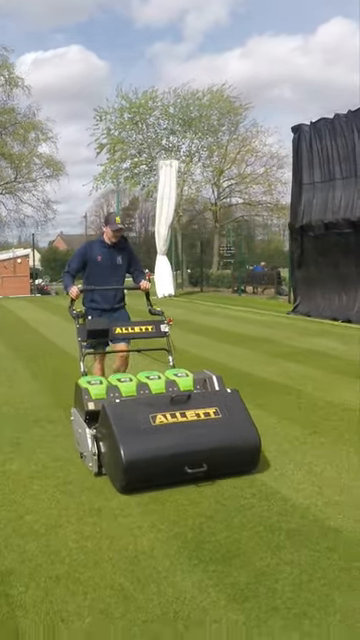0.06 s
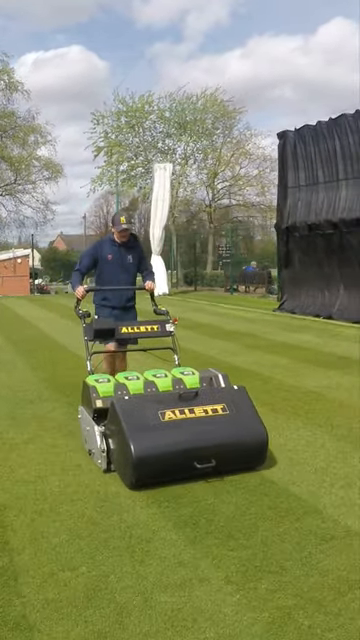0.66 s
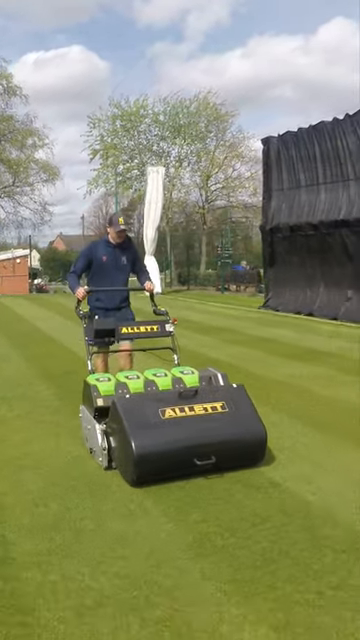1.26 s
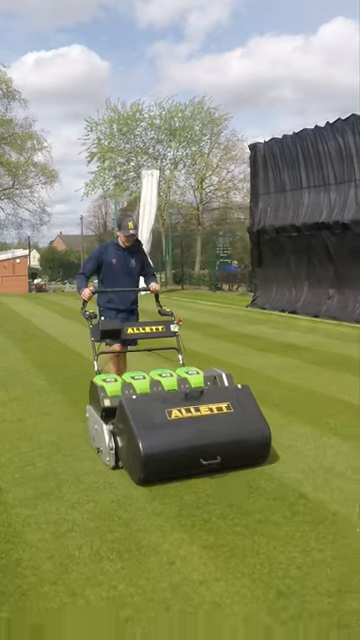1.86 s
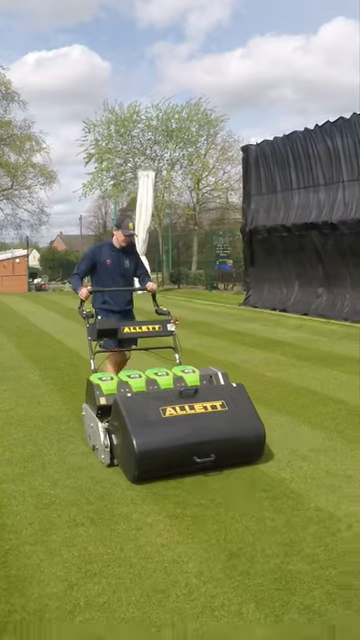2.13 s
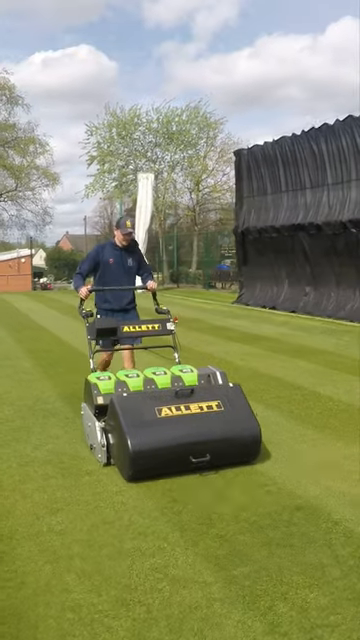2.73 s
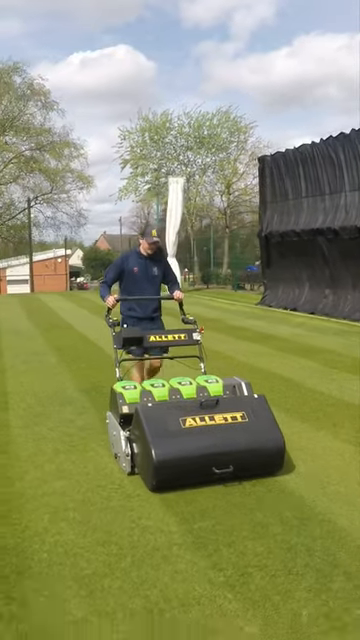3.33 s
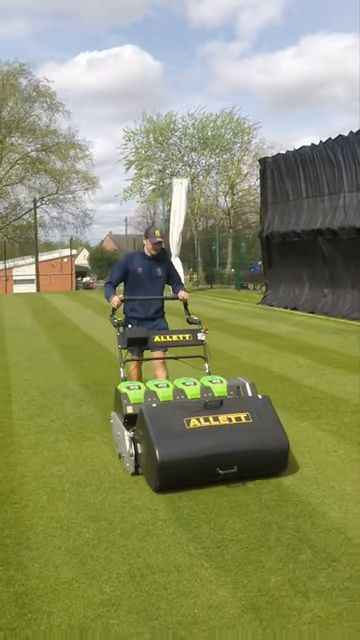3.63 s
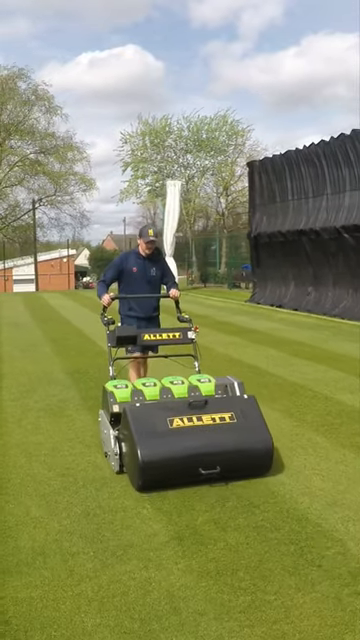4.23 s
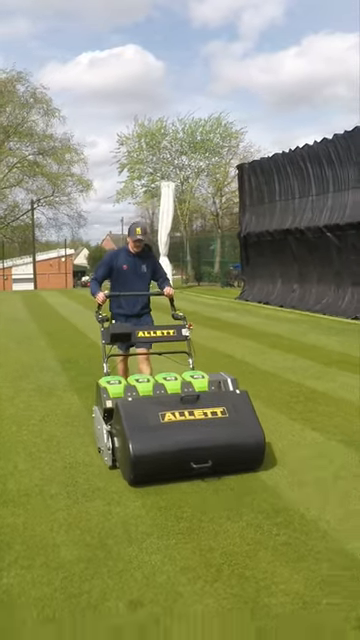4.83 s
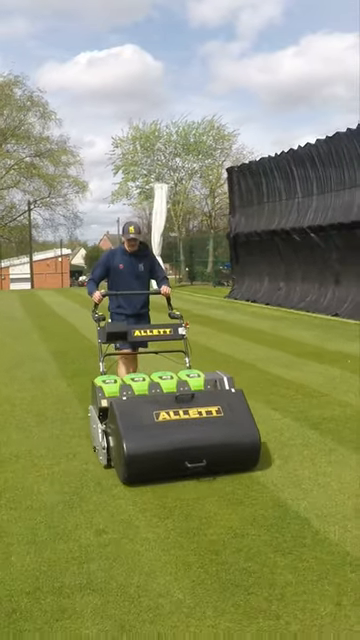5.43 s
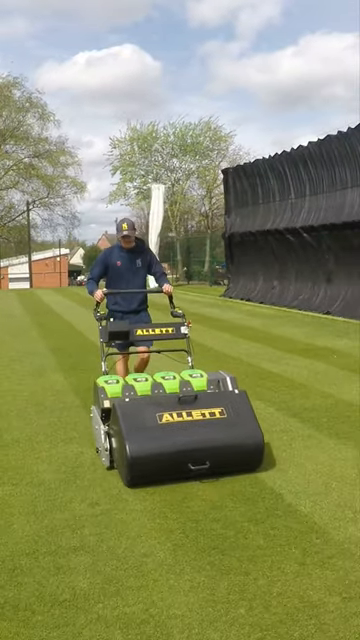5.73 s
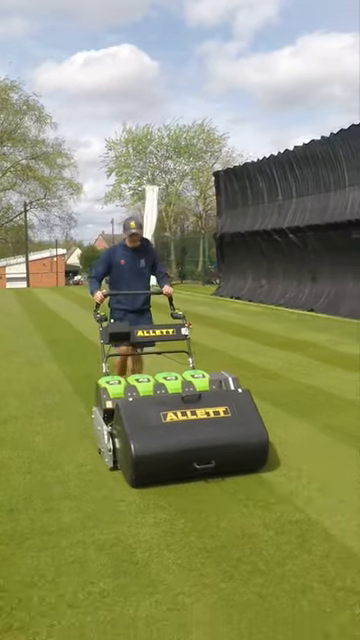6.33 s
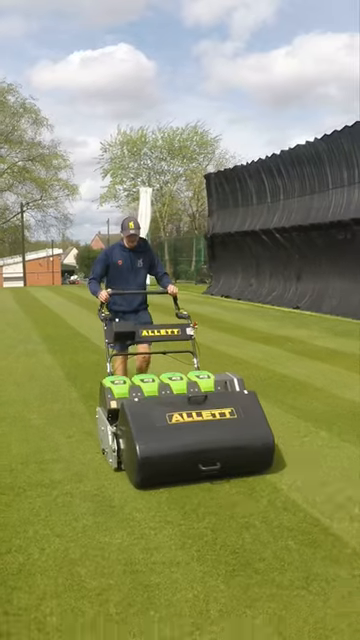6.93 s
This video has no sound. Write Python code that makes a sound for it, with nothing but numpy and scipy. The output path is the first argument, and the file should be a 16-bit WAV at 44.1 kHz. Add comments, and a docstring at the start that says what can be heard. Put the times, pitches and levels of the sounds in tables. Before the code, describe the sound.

Wind buffets the microphone over the steady hum, wavering whine and blade whirr of an electric cylinder mower cutting grass.

```python
"""A battery cylinder mower is walked over a lawn, a few metres from a hand-held phone that moves with it.
The blades brush the bottom blade and ring the deck, the roller booms in the grass box, cut grass hisses.
The motor hums, a gear whines and sags under load; grit ticks and a twig snaps in the blades.
Wind buffets the microphone; there are no walls to echo."""
import sys
import numpy as np
from scipy import signal
from scipy.fft import rfft, irfft
from scipy.io import wavfile
from scipy.ndimage import uniform_filter1d

SR = 44100
rng = np.random.default_rng(int(sys.argv[2]) if len(sys.argv) > 2 else 0)


def dump(signal):
    """Clip the signal to [-1, 1] and save it as 16-bit WAV at the path in sys.argv[1]."""
    limited = np.clip(np.atleast_2d(signal).T, -1, 1)
    pcm = np.round(limited * 32767).astype(np.int16)
    wavfile.write(sys.argv[1], SR, pcm)


N = 312228
TIME = np.arange(N) / SR
FREQ = np.maximum(np.arange(N // 2 + 1) * SR / N, 1)


def cutter():
    """The roller knocks the box; the blades rattle the deck and shear thousands of stalks a second."""
    # resonances: f/Hz, width/Hz, level/dB
    box_modes = [(61, 140, -57.5), (119.2, 23.5, -43), (138.7, 29, -47.5), (197, 61, -59), (270, 75, -70),
                 (350.5, 26.3, -61), (402.4, 41, -66), (460.4, 42, -70), (497.4, 30.3, -69.5)]  # grass box and chassis
    deck_modes = [(625, 21, -81), (726, 120, -77.5), (860, 83, -77), (936, 117, -77.5), (1053, 44, -87.5),
                  (1245, 185, -84), (1416, 140, -73), (1495, 134, -73), (1622, 184, -75.5),
                  (1865, 186, -78), (1986, 57, -76), (2117, 128, -80), (2333, 220, -85.5), (2560, 260, -89)]  # cutter and deck
    blade_modes = [(5980, 920, -79.5), (6750, 950, -95)]  # shearing blades
    # cut grass spraying into the box: f/Hz, level/dB
    spray_spectrum = [(500, -99), (2950, -93), (3350, -85), (4000, -85.5), (4850, -85.5), (5350, -93.5),
                      (7000, -87), (7900, -92.5), (8700, -90.5), (10000, -95), (11000, -100.5),
                      (12500, -102), (13500, -106), (15300, -110)]
    load_db = cutting_load_db()
    boom = colour(impacts(2500, 2.36), resonances(box_modes) * band(8.9, 517)) * undb(0.2 * load_db)
    whirr = colour(impacts(6000, 2.64), resonances(deck_modes)) * undb(0.24 * load_db)
    tufts = walk(26)  # sward thickness varies from cut to cut
    ring_db = 0.28 + 1.15 * load_db + 0.57 * tufts
    ring = colour(impacts(6000, 5.5), resonances(blade_modes)) * undb(ring_db)
    spray_db = 0.5 * load_db + 0.52 * tufts
    spray = colour(impacts(11000, 3.5), slope(spray_spectrum)) * undb(spray_db)
    return boom + whirr + ring + spray


def cutting_load_db():
    """Load follows the sward's thickness and surges as each step pushes the mower on."""
    # sward thickness: t/s, load/dB
    sward = [(0.0, 0.0), (0.6, 0.7), (1.2, 0.1), (1.5, 1.5), (1.8, 1.5), (2.4, -0.9), (3.1, -0.7),
             (3.65, 0.4), (4.5, -1.3), (5.3, -2), (5.75, 0.6), (6.25, -1.5), (6.55, -1.5), (7.08, -0.2)]
    step_hz, surge_db = 2.17, 0.73
    sward_db, = curves(sward)
    return sward_db + surge_db * np.cos(2 * np.pi * step_hz * TIME)


def motor():
    """The cutter motor hums at its turning rate; in spells the overtones swell to a buzz."""
    # hum: t/s, f/Hz, level/dB
    hum = [(0, 93.0, -51), (1.9, 93.7, -38), (3.05, 93.7, -39), (3.5, 92.9, -34.5), (4.1, 92.5, -40),
           (4.4, 92.3, -29), (5.0, 93.0, -30.5), (5.75, 92.3, -27), (6.3, 92.5, -30.5), (7.08, 92.2, -40)]
    # buzzy spells: start/s, length/s, level at centre/dB, centre/Hz
    buzzes = [(1.75, 1.17, -31.5, 108), (3.224, 0.32, -40, 287), (4.853, 0.88, -37, 187)]
    spread_hz, rest_db, sway_db = 110, -54.5, 1.5
    turn_hz, hum_db = curves(hum)
    out = tone(turn_hz, hum_db) * flutter(28, 0.33)
    for harmonic in (2, 3, 4):
        hz = harmonic * turn_hz
        buzz = 0
        for start_s, length_s, db, centre_hz in buzzes:
            nearness = np.exp(-((hz - centre_hz) / spread_hz) ** 2)
            buzz += undb(db) * nearness * spell(start_s, length_s, attack_s=0.1, release_s=0.28)
        out += np.hypot(buzz, undb(rest_db)) * tone(hz, sway_db * walk(3.3)) * flutter(27, 0.24)
    return out


def drive():
    """The drive gives a wavering drone and four steadier tones."""
    # drone: t/s, level/dB
    drone_levels = [(0, -48.5), (.9, -44), (1.5, -52), (2.9, -49), (4.2, -57), (5.1, -61), (6.05, -46.5),
                    (6.5, -56), (7.08, -51)]
    # drive tones: f/Hz, level/dB, wander/Hz, sway/dB
    partials = [(178, -44.5, 1.5, 2), (1428, -60, 6, 2.5), (1606, -64, 4, 2.5), (1948, -66, 9, 2)]
    drone_hz, drone_wander_hz = 355.2, 8.94
    drone_db, = curves(drone_levels)
    drone = tone(drone_hz + drone_wander_hz * walk(8.97), drone_db) * flutter(19, 0.34)
    return drone + sum(tone(hz + wander_hz * walk(8.4), db + sway_db * walk(2.4))
                       for hz, db, wander_hz, sway_db in partials)


def controller():
    """The speed controller sings at a constant pitch and its octave."""
    switch_hz = 1000
    return tone(switch_hz, -70 + 3.1 * walk(2.4)) + tone(2 * switch_hz, -66 + 3 * walk(2.2))


def gear():
    """The drive gear's whine sags in pitch with the load at every step and recovers."""
    # whine: t/s, level/dB
    whine_levels = [(0, -55), (.45, -54.5), (1.6, -54.5), (2.15, -55), (3.0, -57), (3.65, -53.5),
                    (4.3, -63), (5.6, -65), (6.5, -54), (7.08, -55.5)]
    mesh_hz, sag_hz_per_db, wander_hz = 800.4, 5, 9
    whine_db, = curves(whine_levels)
    whine_hz = mesh_hz - sag_hz_per_db * cutting_load_db() + wander_hz * walk(26)
    return tone(whine_hz, whine_db + 2.5 * walk(7.4)) * flutter(47, 0.37)


def bearing():
    """A bearing whistles faintly, climbs in pitch and fades."""
    # whistle: t/s, f/Hz, level/dB
    whistle = [(0, 1423, -57), (.5, 1510, -55), (.8, 1524, -58.5), (1.3, 1556, -55), (1.8, 1559, -51.5),
               (2.6, 1558, -58), (3.1, 1524, -74), (7.08, 1560, -68)]
    hz, db = curves(whistle)
    return tone(hz + 9 * walk(17.1), db) * flutter(6.5, 0.44)


def debris():
    """Hard things meet the blades: a grain of grit ticks, a twig scrapes and snaps."""
    # twig scrapes: t/s, peak level/dB, rise/s, decay/s
    nicks = [(5.9, -42, .013, 0.013), (5.928, -34.5, .001, 0.01), (5.98, -48, .025, .025)]
    # twig resonances: f/Hz, width/Hz, relative level/dB
    twig_modes = [(3900, 480, -2), (4600, 610, 1), (7020, 700, 5), (8470, 1500, -4), (12300, 2700, -15)]
    # grit on the deck, then the twig breaking: t/s, level/dB, low edge/Hz, high edge/Hz
    ticks = [(1.3703, -15.5, 3300, 8700), (5.9268, -24, 6500, 14500)]
    envelope = sum(undb(db) * swell(peak_s, rise_s, decay_s) for peak_s, db, rise_s, decay_s in nicks)
    scrape = rng.choice([-1, 1], N) * envelope
    out = filtered(scrape, unit(resonances(twig_modes)))
    for at_s, db, low_hz, high_hz in ticks:
        impulse = np.arange(N) == int(at_s * SR)
        out += undb(db) * filtered(impulse, unit(band(low_hz, high_hz)))
    return out


def wind():
    """Eddies at the microphone port; stronger gusts are brighter, the strongest are rounded off."""
    # eddy spectrum: f/Hz, relative level/dB
    buffet = [(5.9, -34), (10, -6.5), (32, 4), (52, 1.5), (161, -13.5), (187, -14), (250, -26), (285, -38),
              (316, -26), (330, -44), (430, -73), (730, -120)]
    ceiling = 0.52
    level_db = wind_level_db()
    eddies = colour(rng.standard_normal(N), slope(buffet))
    deep = filtered(eddies, band(1, 80))
    deep_rms = np.sqrt(uniform_filter1d(deep ** 2, size=4410))  # over 0.1 s
    upper = (eddies - deep) / deep.std()
    upper_db = 0.68 + 0.23 * (level_db - level_db.max())
    pressure = (deep / deep_rms + undb(upper_db) * upper) * undb(level_db)
    return filtered(ceiling * np.tanh(pressure / ceiling), band(4.3, 410))


def wind_level_db():
    """Bell-shaped gusts, building faster than they die, on top of a restless breeze."""
    # breeze: t/s, level/dB
    breeze = [(0, -27.5), (2.7, -31), (3.2, -34.5), (4.2, -30), (4.6, -37), (5.05, -37), (5.3, -37),
              (5.8, -27), (6.2, -38.5), (7.08, -24)]
    # gusts: t/s, peak level/dB, decay/s
    gusts = [(0.135, -17, 0.032), (0.33, -14, 0.034), (0.45, -14.5, 0.051), (0.575, -13, 0.15),
             (1.01, -19, .025), (1.08, -16, 0.018), (1.35, -20.5, 0.12), (1.672, -17, .03),
             (1.92, -20, 0.058), (2.06, -18, .09), (2.165, -16.5, .04), (2.555, -24.5, 0.048),
             (3.725, -13, 0.086), (3.93, -15.5, 0.041), (4.01, -17, 0.037), (4.22, -26.5, 0.081),
             (4.91, -18, 0.072), (5.825, -20, 0.045), (6.84, -24.5, .035), (6.98, -12.5, 0.024),
             (7.057, -15, 0.015)]
    sway_db, rise_share = 2, 0.71
    breeze_db, = curves(breeze)
    power = undb(breeze_db + sway_db * walk(9.5)) ** 2
    for peak_s, db, decay_s in gusts:
        width_s = np.where(TIME < peak_s, rise_share * decay_s, decay_s)
        power += undb(db) ** 2 * np.exp(-((TIME - peak_s) / width_s) ** 2)
    return 10 * np.log10(power)


def undb(db):
    """Decibels to gain."""
    return 10 ** (np.asarray(db) / 20)


def unit(x):
    """Scale to rms 1."""
    return x / np.sqrt(np.mean(x ** 2))


def curves(table):
    """Each column after the first, interpolated linearly in time."""
    times_s, *columns = np.transpose(table)
    return [np.interp(TIME, times_s, column) for column in columns]


def filtered(x, gain):
    """Apply a gain given over FREQ."""
    return irfft(rfft(x) * gain, N)


def colour(x, gain):
    """Filter white excitation of rms 1 so that `gain` is its amplitude per root Hz."""
    return filtered(x, gain) * np.sqrt(SR / 2)


def band(low_hz, high_hz):
    """Gain of a steep band-pass."""
    return 1 / np.sqrt((1 + (low_hz / FREQ) ** 20) * (1 + (FREQ / high_hz) ** 20))


def slope(points):
    """Gain through (f/Hz, level/dB) points on a log-frequency axis."""
    hz, db = np.transpose(points)
    return undb(np.interp(np.log(FREQ), np.log(hz), db))


def resonances(modes):
    """Gain of steep resonances whose powers add."""
    power = 0
    for hz, width_hz, db in modes:
        detuning = (FREQ ** 2 - hz ** 2) / (FREQ * width_hz)
        power += (undb(db) / (1 + detuning ** 2)) ** 2
    return np.sqrt(power)


def walk(rate_hz):
    """Random drift of rms 1, low-passed at rate_hz."""
    return unit(filtered(rng.standard_normal(N), 1 / (1 + (FREQ / rate_hz) ** 4)))


def flutter(rate_hz, depth):
    """A gain that trembles round 1."""
    return 1 + depth * walk(rate_hz)


def impacts(per_s, spread_db):
    """A dense random stream of tiny knocks of uneven size, rms 1."""
    struck = rng.random(N) < per_s / SR
    signs = rng.choice([-1, 1], N)
    sizes = undb(spread_db * np.clip(rng.standard_normal(N), -2, 2))
    return unit(struck * signs * sizes)


def tone(hz, db):
    """A sine that follows a pitch and an rms level."""
    cycles = np.cumsum(hz * np.ones(N)) / SR + rng.random()
    return np.sqrt(2) * undb(db) * np.sin(2 * np.pi * cycles)


def swell(peak_s, rise_s, decay_s):
    """A gain that grows to 1 at peak_s and dies away."""
    return np.exp(-np.maximum((peak_s - TIME) / rise_s, (TIME - peak_s) / decay_s))


def spell(start_s, length_s, attack_s, release_s):
    """A gain that rises, holds at 1 and is released."""
    attack = np.clip((TIME - start_s) / attack_s, 0, 1)
    return attack * np.exp(-np.maximum(TIME - start_s - length_s, 0) / release_s)


def scene():
    """The mower in the open air, with wind on the microphone; mono."""
    mower = cutter() + motor() + drive() + controller() + gear() + bearing() + debris()
    return (mower + wind())[None]


def record(dry):
    """The phone cuts the top treble; both ends fade briefly."""
    top_hz, fade_s = 15250, 0.004
    fade = np.minimum(np.minimum(TIME, TIME[-1] - TIME) / fade_s, 1)
    lowpass = signal.ellip(12, 0.1, 90, top_hz, fs=SR, output="sos")
    return fade * signal.sosfilt(lowpass, dry * fade)


dry = scene()
out = record(dry)
dump(out)
```